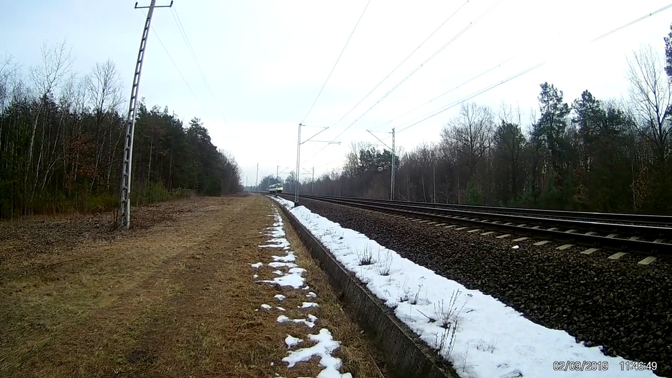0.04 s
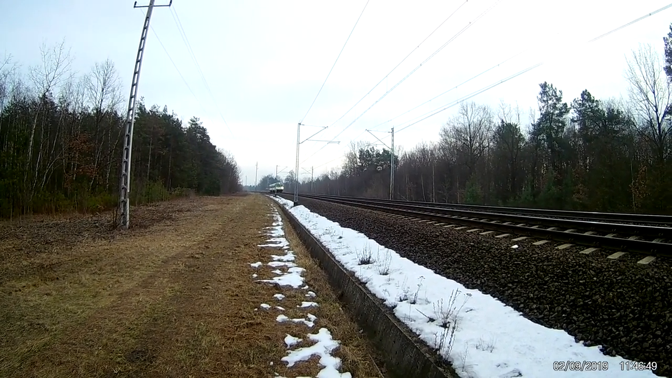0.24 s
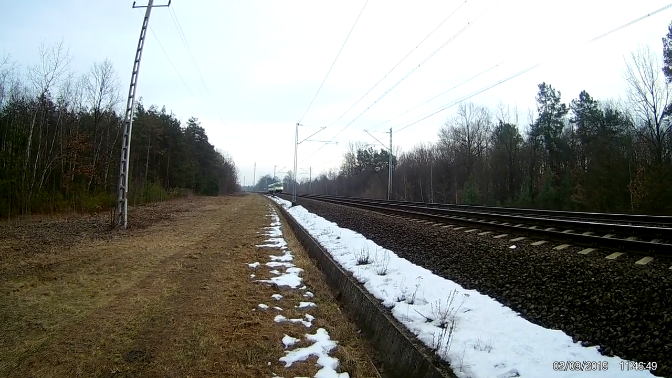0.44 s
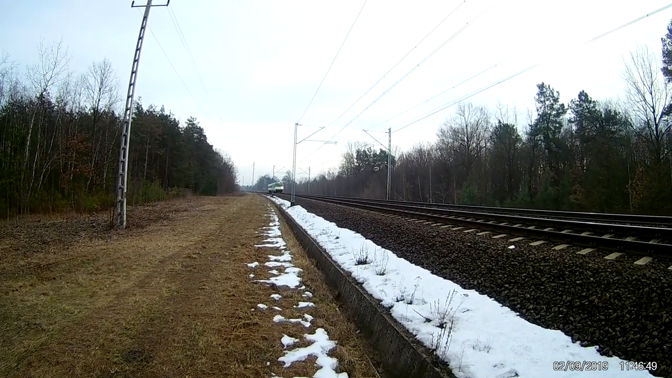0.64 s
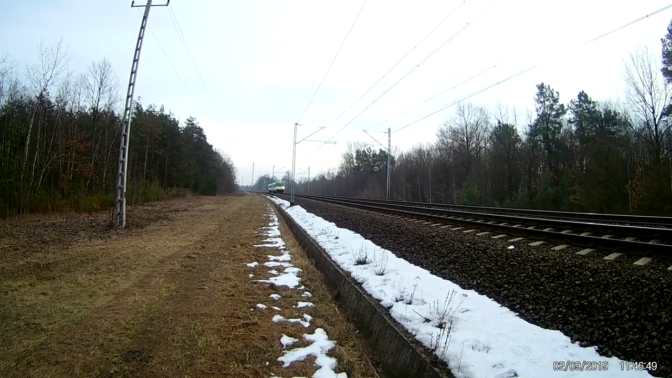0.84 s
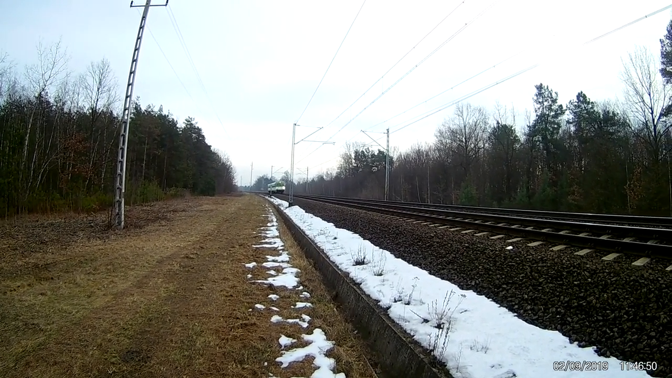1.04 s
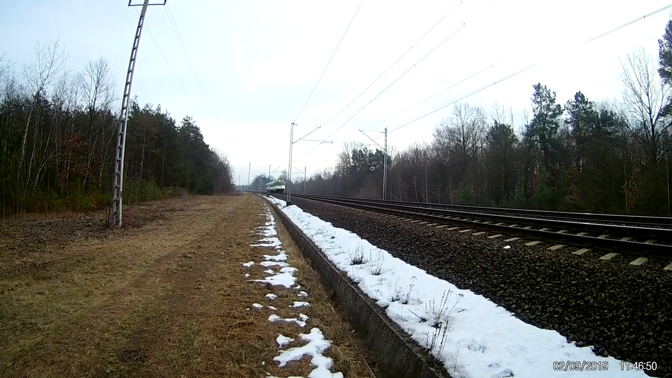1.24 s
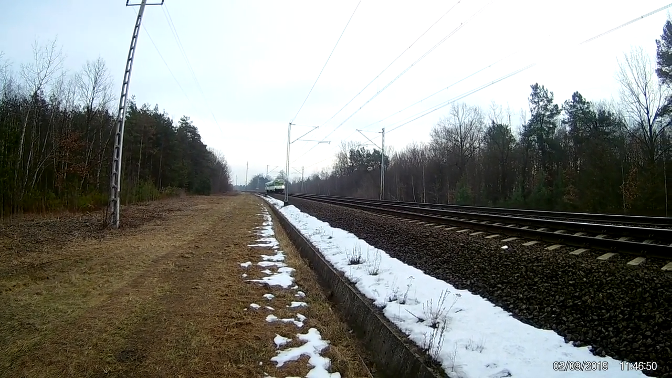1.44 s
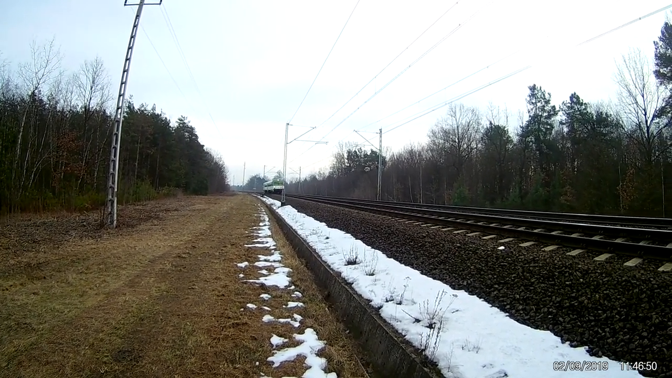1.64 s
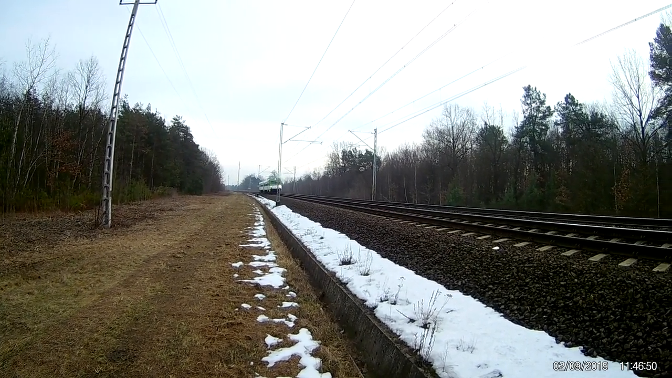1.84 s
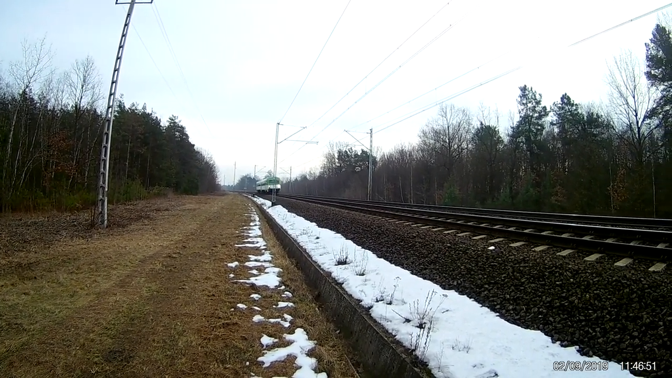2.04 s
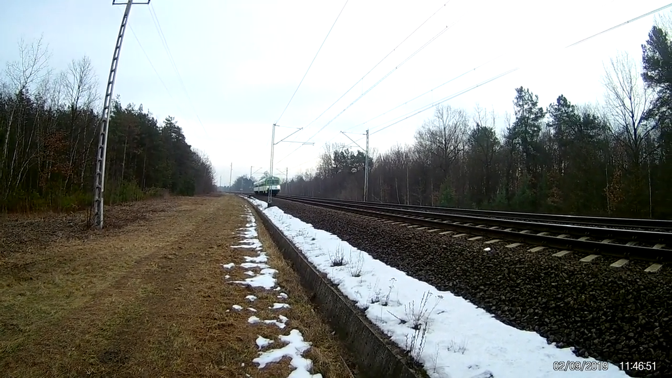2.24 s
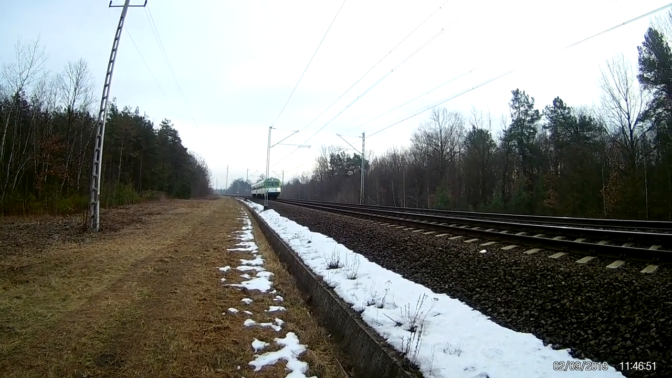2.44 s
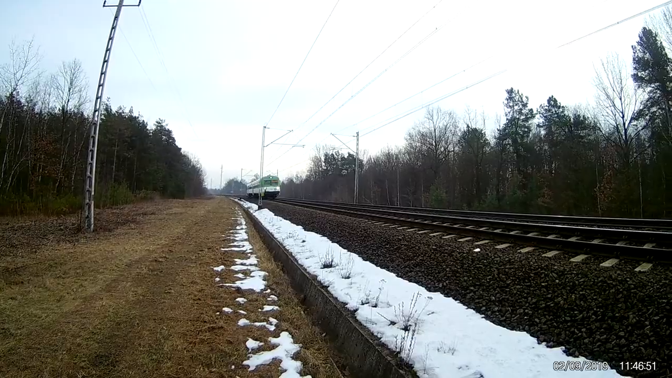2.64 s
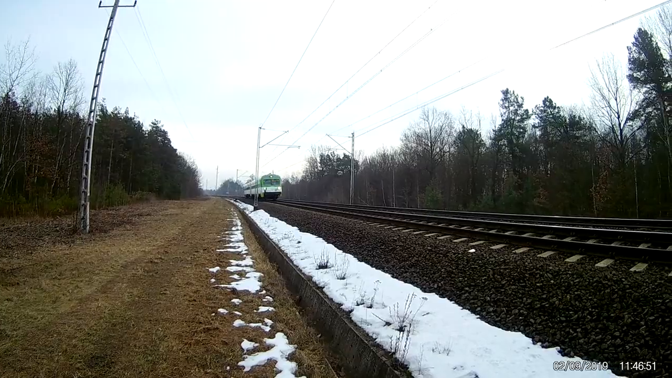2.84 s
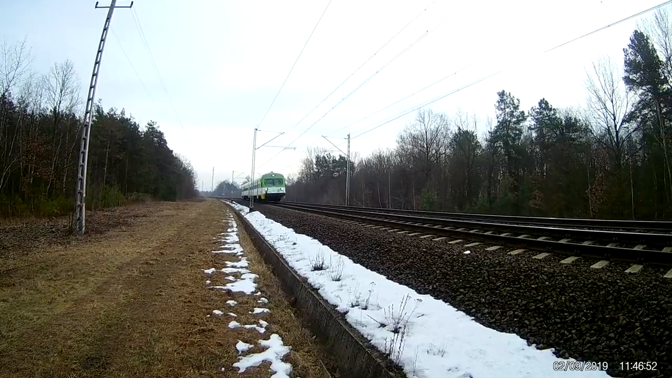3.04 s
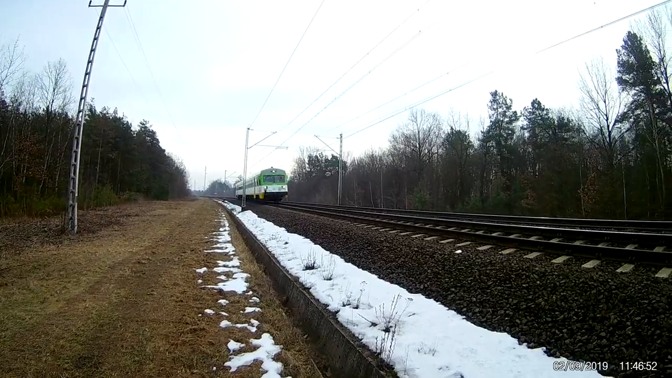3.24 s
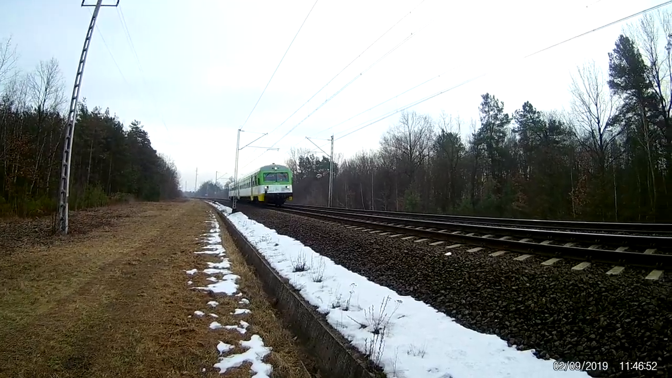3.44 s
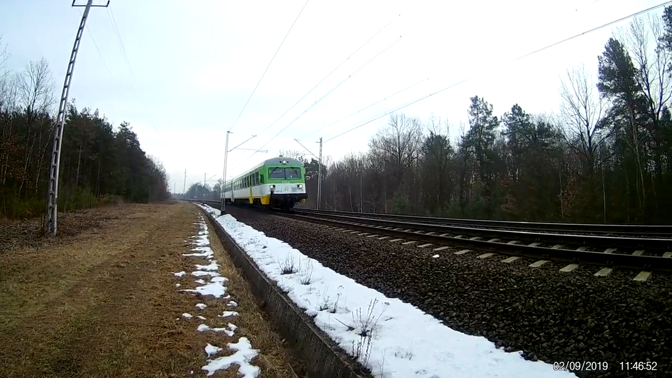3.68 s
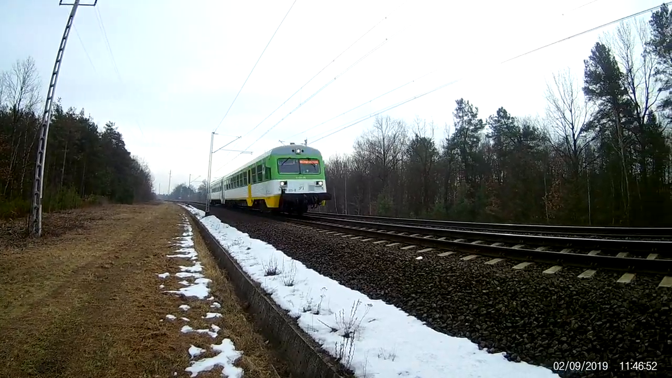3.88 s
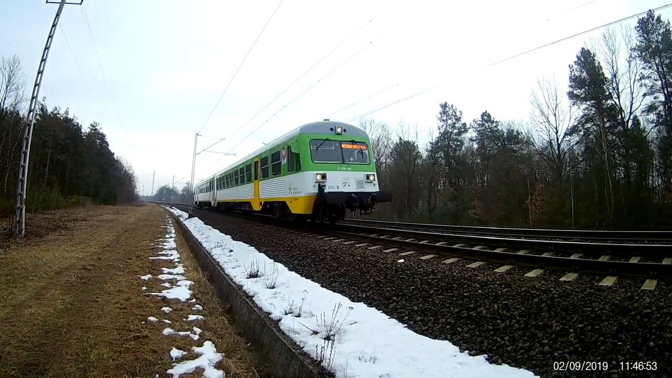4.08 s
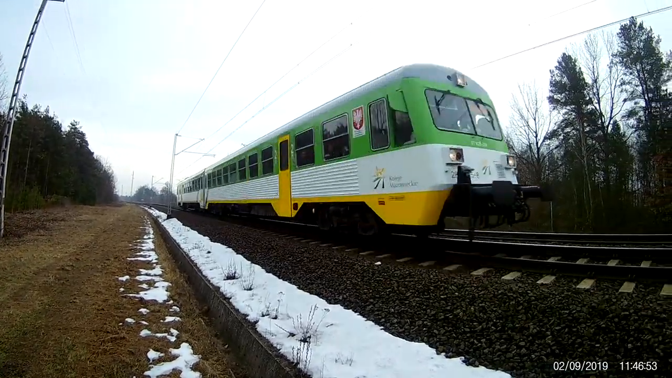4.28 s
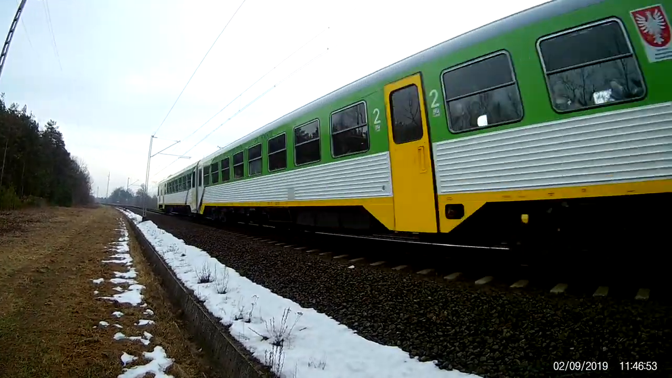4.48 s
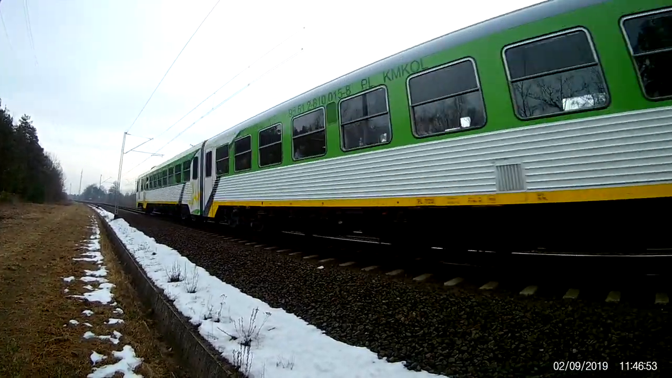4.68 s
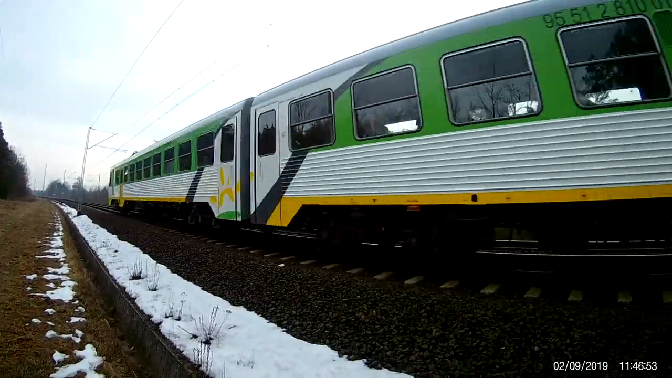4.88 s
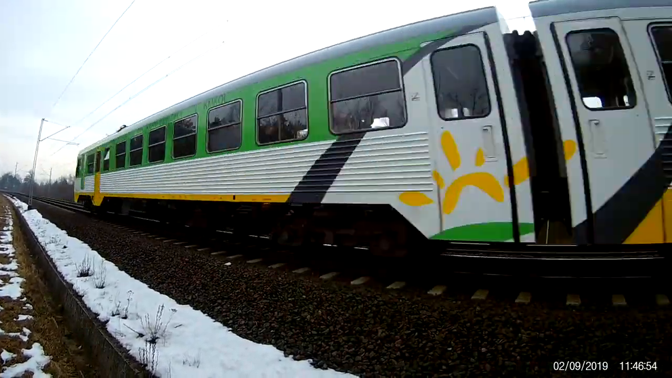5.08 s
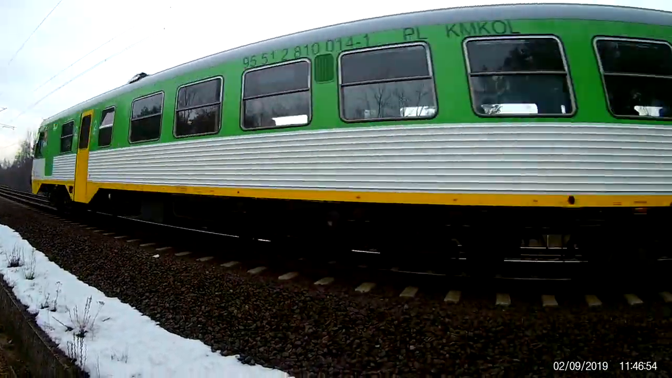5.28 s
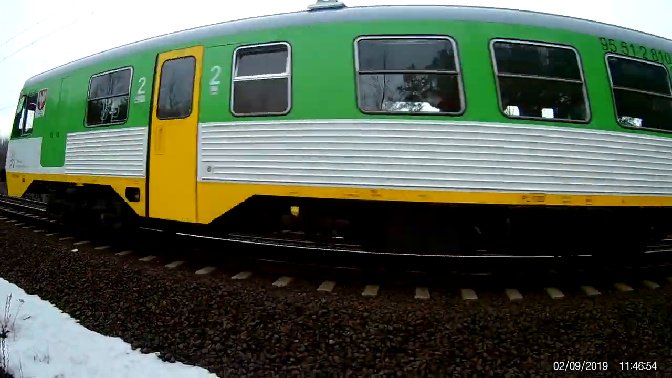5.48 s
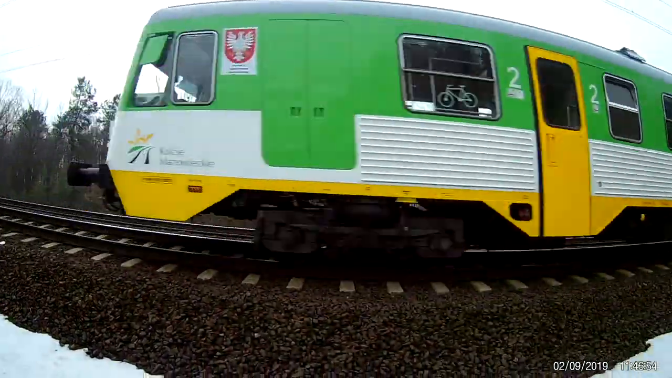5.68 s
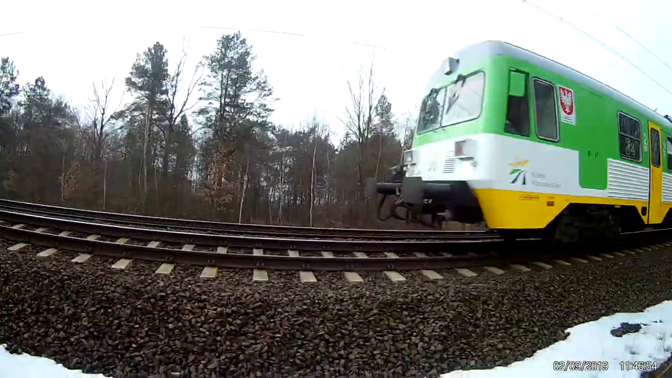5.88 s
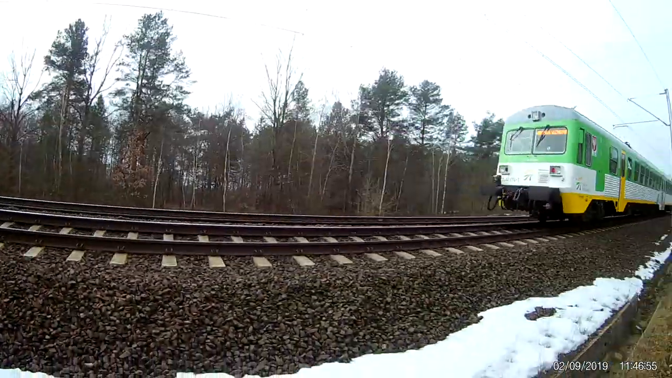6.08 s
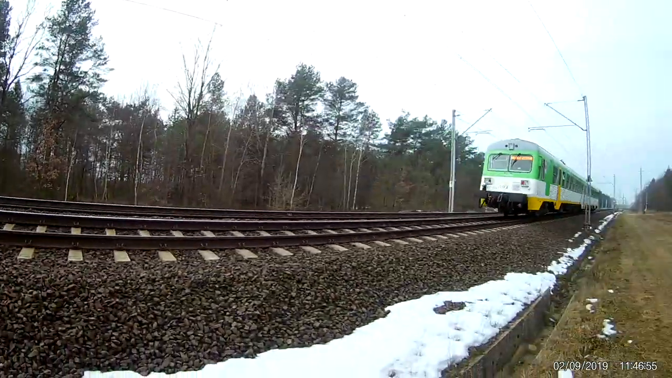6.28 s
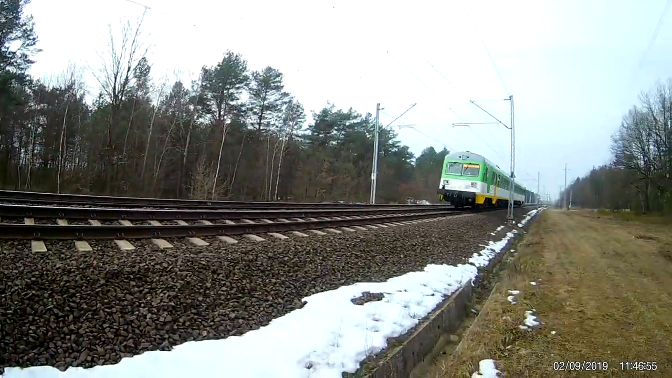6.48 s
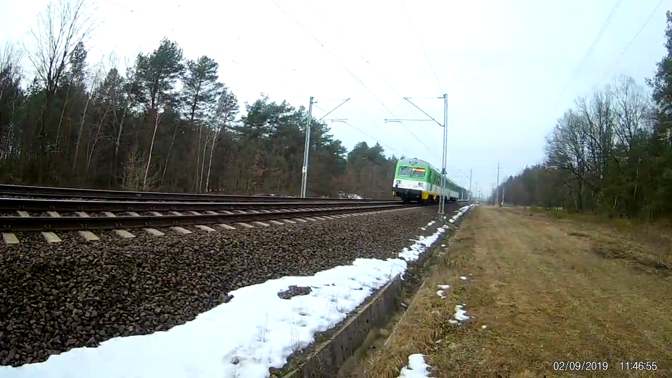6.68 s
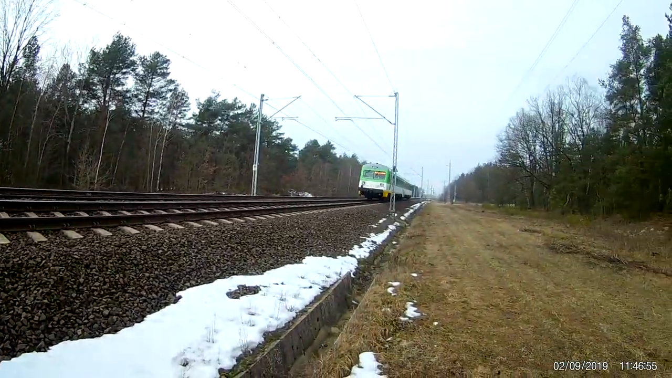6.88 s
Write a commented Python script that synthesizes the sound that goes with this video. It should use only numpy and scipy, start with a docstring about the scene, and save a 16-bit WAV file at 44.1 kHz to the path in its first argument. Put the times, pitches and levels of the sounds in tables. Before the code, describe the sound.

A single close trackside microphone hears a fast diesel railcar pair. First come soft low thumps from handling and a faint far-off rumble in the woods. The wheel roar swells steeply, pulsing quickly, with a thin high note in the rail. It peaks in about a second of loud rushing, ringing and droning, slides down in pitch, and recedes quickly with a lingering metallic singing.

```python
"""Soft bumps at the microphone come first, over the hush of a forest and the distant roar of a train.
A two-car diesel then runs past at 116 km/h, 7 m from the microphone: noise coloured by angle makes the roar
and hiss of its wheels, and a worn tread throbs. Randomly shaken modes make the ring of the wheels and sine
orders the drone of two engines, both dropping in pitch as they go by. Grit ticks under the cars, a thin note
runs in the rail, and the last wheels sing out behind the train."""
import sys
import numpy as np
from scipy import signal
from scipy.fft import rfft, irfft
from scipy.io import wavfile
from scipy.ndimage import uniform_filter1d, minimum_filter1d

SR = 44100
rng = np.random.default_rng(int(sys.argv[2]) if len(sys.argv) > 2 else 0)


def dump(signal):
    """Clip the signal to [-1, 1] and save it as 16-bit WAV at the path in sys.argv[1]."""
    limited = np.clip(np.atleast_2d(signal).T, -1, 1)
    pcm = np.round(limited * 32767).astype(np.int16)
    wavfile.write(sys.argv[1], SR, pcm)


N = 305543
FFT_SIZE, HOP = 1024, 256  # samples
TIME = np.arange(N) / SR
FRAME_S = np.arange(N // HOP + 5)[:, None] * HOP / SR
BIN_HZ = np.fft.rfftfreq(FFT_SIZE, 1 / SR)

TRAIN_SPEED, SOUND_SPEED = 32.2, 343  # m/s
TRACK_M = 7.0  # distance from the microphone to the rails


def gain_of(db):
    """Decibels to amplitude."""
    return 10 ** (np.asarray(db) / 20)


def evened(x):
    """Scales to rms 1."""
    return x / np.sqrt(np.mean(x ** 2) + 1e-20)


def colour(points):
    """A spectrum in dB on the bins, falling 60 dB per octave beyond its ends."""
    hz, db = np.transpose(points)
    octave, known = np.log2(BIN_HZ + 1), np.log2(hz + 1)
    beyond = abs(octave - np.clip(octave, known[0], known[-1]))
    return np.interp(octave, known, db) - 60 * beyond


def band_db(field_db, lo, hi):
    """Level of each frame of a time-frequency field between two frequencies."""
    band = field_db[..., (BIN_HZ >= lo) & (BIN_HZ < hi)]
    power = (gain_of(band) ** 2).sum(-1, keepdims=True)
    return 10 * np.log10(power + 1e-20)


def noise(field_db, patchy_db):
    """Noise shaped by the bin levels, with small random patches in time and frequency."""
    real, imag, patches = rng.standard_normal((3, len(FRAME_S), len(BIN_HZ)))
    patches = uniform_filter1d(patches, size=8, axis=0)
    patches = evened(uniform_filter1d(patches, size=7, axis=1))
    bins = (real + 1j * imag) * gain_of(field_db + patchy_db * patches)
    sound = signal.istft(bins.T, nperseg=FFT_SIZE, noverlap=FFT_SIZE - HOP)[1][:N]
    return sound * np.sqrt(3 / 2)  # makes up for the overlap of independent frames


def wander(rate_hz):
    """Slow random drift of rms 1: noise through a Gaussian low-pass."""
    step = 32  # samples between the points of the drift
    size = N // step + 2
    low_pass = np.exp(-(np.fft.rfftfreq(size, step / SR) / rate_hz) ** 2)
    slow = irfft(rfft(rng.standard_normal(size)) * low_pass, size)
    return np.interp(np.arange(N) / step, np.arange(size), evened(slow))


def shaken(turns, width_hz):
    """A lightly damped mode shaken at random: a fuzzy tone of rms 1."""
    in_phase = wander(width_hz) * np.cos(2 * np.pi * turns)
    return in_phase + wander(width_hz) * np.sin(2 * np.pi * turns)


def swell(middle_s, half_s, height):
    """A smooth rise and fall in time."""
    return height * np.exp(-((TIME - middle_s) / half_s) ** 2)


def add(mix, s, sound):
    """Mixes a sound in at the time s."""
    part = mix[round(s * SR):][:len(sound)]
    part += sound[:len(part)]


def knock(hz, width_hz, decay_s):
    """A short burst of noise in one broad, steep-sided resonance, with peak 1."""
    t = TIME[:SR // 4]
    burst = rng.standard_normal(len(t)) * np.exp(-t / decay_s)
    pole = np.exp((2j * hz - width_hz) * np.pi / SR)
    sound = signal.lfilter([1], np.poly([pole, pole, pole]), burst).real
    return sound / abs(sound).max()


def flyby(abreast_s, t):
    """Distance (m) and Doppler factor of a point on the train, as heard at the times t."""
    mach = TRAIN_SPEED / SOUND_SPEED
    late = t - abreast_s + TRACK_M / SOUND_SPEED
    along_m = TRAIN_SPEED * late
    slant_m = np.sqrt(along_m ** 2 + (1 - mach ** 2) * TRACK_M ** 2)
    far = (slant_m - mach * along_m) / (1 - mach ** 2)
    return far, 1 / (1 + mach * (along_m - mach * far) / far)


# the bounce off the ground acts most at one range: distance [m], half-width [doublings of distance]
DIP_M, DIP_WIDTH = 16, 0.81
SIDE_FOCUS = 5  # how narrowly sound is beamed to the side (power of the sine of the angle)


def passing(times, levels_db, carry, t):
    """Summed level (dB) of like sources that come abreast at the given times, by distance and angle."""
    doubling_db, side_db, past_db, dip_db = carry
    power = 0
    for s, db in zip(times, levels_db):
        far, doppler = flyby(s, t)
        near = TRACK_M / far  # also the sine of the angle to the track
        past = (1 / doppler - 1) * SOUND_SPEED / TRAIN_SPEED  # its cosine: -1 ahead, +1 behind
        ground_dip_db = dip_db * np.exp(-(np.log2(far / DIP_M) / DIP_WIDTH) ** 2)
        range_db = doubling_db * np.log2(near) - ground_dip_db
        angle_db = side_db * (near ** SIDE_FOCUS - 1) + past_db * past
        power += gain_of(db + range_db + angle_db) ** 2
    return 10 * np.log10(power)


# each bogie abreast of the microphone, levels before the ground dip: (time [s], roar [dB],
# harsh upper roar [dB], hiss [dB], rail sizzle [dB], track-bed rumble [dB])
BOGIES = [(4.455, -17.5, -20.8, -44, -38, -30), (4.86, -15.5, -17, -36.5, -39, -30),
          (5.3, -14.5, -18, -36, -46.5, -27), (5.69, -16, -20.5, -40.5, -53, -29.5)]
# how each sound carries to the microphone: (loss per doubling of distance [dB], rise side-on [dB],
# rise behind and equal fall ahead [dB], loss in the ground dip [dB])
ROAR_CARRY = (10, -5, -0.8, 4.5)
HARSH_CARRY = (8.5, -0.2, 0.9, 1.5)
HISS_CARRY = (10.5, -2.5, 0, 5)
SIZZLE_CARRY = (9.8, 6, 0.3, 2)
RUMBLE_CARRY = (10.5, -2.5, -0.6, 0.5)


def bogie_levels(t):
    """Levels (dB) of the five sounds of the bogies at the times t."""
    times, *columns = np.transpose(BOGIES)
    carries = dict(roar=ROAR_CARRY, harsh=HARSH_CARRY, hiss=HISS_CARRY, sizzle=SIZZLE_CARRY, rumble=RUMBLE_CARRY)
    return {name: passing(times, levels, carries[name], t) for name, levels in zip(carries, columns)}


def bogie_gain(name):
    """One sound of the bogies as a gain for every sample."""
    frame_s = FRAME_S.ravel()
    return gain_of(np.interp(TIME, frame_s, bogie_levels(frame_s)[name]))


# colour of the hush around the microphone: (frequency [Hz], relative level per Hz [dB])
FOREST = [(60, 0), (150, -3.5), (250, -22.5), (330, -3), (430, -1), (560, 1), (900, -8), (2000, -24),
          (5000, -43.5)]
FOREST_DB = -54  # level between 20 and 8000 Hz


def forest():
    """The low, steady hush of the woods, as coloured noise."""
    hush = colour(FOREST)
    return noise(hush - band_db(hush, 20, 8000) + FOREST_DB, patchy_db=1)


# soft bumps at the microphone: (time [s], peak [dB])
BUMPS = [(.1, -35.5), (.18, -35.5), (.265, -39), (0.368, -39), (.425, -36), (1.031, -36), (1.108, -42)]


def microphone_bumps():
    """Dull bumps nudge the microphone: short bursts in one broad low resonance."""
    out = np.zeros(N)
    for s, db in BUMPS:
        add(out, s, gain_of(db) * knock(hz=126, width_hz=340, decay_s=0.021))
    return out


# grit close by under the cars: (time [s], peak [dB], pitch of the ring [Hz], decay [s])
TICKS = [(4.699, -22, 4030, .011), (4.756, -21, 4200, 0.0094), (4.82, -33, 8600, .0005),
         (4.874, -24, 3960, 0.009), (4.934, -27, 4100, .009), (5.352, -24.5, 3940, 0.022)]


def grit_ticks():
    """Grit ticks against the running gear: each hit is a short, broadly resonant burst."""
    out = np.zeros(N)
    for s, db, hz, decay_s in TICKS:
        add(out, s, gain_of(db) * knock(hz, width_hz=0.6 * hz, decay_s=decay_s))
    return out


# colours of the air, grit and track bed below the cars: (frequency [Hz], relative level per Hz [dB])
RUMBLE = [(32, -22.5), (55, -6), (75, 2.5), (110, 0), (160, 2.5), (205, 4.5), (260, -1.5), (310, -0.5),
          (380, -1), (500, -17)]
BUFFET = [(12, -25), (24, -11), (35, -1), (48, -4), (62, -3), (90, -25.5), (160, -54)]
SPRAY = [(7000, -31.5), (8000, -8), (8500, 5.5), (9300, -1), (10300, 3), (11500, -5.5), (13000, -18.5),
         (14600, -20), (16000, -17)]
# underbody of each car abreast, before the ground dip:
# (time [s], spray of air and grit [dB], deep buffeting [dB])
CARS = [(4.77, -58.5, -44), (5.33, -55, -48.5)]
# how they carry, same columns as the bogies' (a negative last column is a gain)
BUFFET_CARRY = (2.5, 0.8, -0.7, -2.5)
SPRAY_CARRY = (7.5, 5.7, 0.5, 0.2)


def underside():
    """Rumble of the track bed under the bogies; buffeting air and a fine spray under each car."""
    times, spray_db, buffet_db = np.transpose(CARS)
    rumble, buffet, spray = colour(RUMBLE), colour(BUFFET), colour(SPRAY)
    rumble = rumble - band_db(rumble, 130, 330) + bogie_levels(FRAME_S)["rumble"]
    buffet = buffet - band_db(buffet, 20, 48) + passing(times, buffet_db, BUFFET_CARRY, FRAME_S)
    spray = spray - band_db(spray, 8300, 15000) + passing(times, spray_db, SPRAY_CARRY, FRAME_S)
    return noise(rumble, patchy_db=1.05) + noise(buffet, patchy_db=3.5) + noise(spray, patchy_db=0.0)


# front and rear engine: (time the block is abreast [s], cycle rate [Hz], lift of its orders when close [dB])
ENGINES = [(4.72, 16.98, 3), (5.36, 15.5, 9)]
# their exhausts abreast, before the ground dip: (time [s], drone [dB])
EXHAUSTS = [(4.63, -21), (5.53, -27.5)]
# six cylinders fire in a cycle: (multiple of the cycle rate, level relative to the drone [dB])
ENGINE_ORDERS = [(2, -27), (3, -10), (4, -22.5), (6, 0), (8, -21), (9, -15.5), (12, -17.5), (15, -23),
                 (18, -26.5), (22, -22.5)]
# how the drone carries, same columns as the bogies'
DRONE_CARRY = (7.5, -5, -1, 7)


def engines():
    """A diesel under each car drones at the firing rate; close up, its block lifts the other orders."""
    out = np.zeros(N)
    for (abreast_s, cycle_hz, block_db), (exhaust_s, drone_db) in zip(ENGINES, EXHAUSTS):
        far, doppler = flyby(abreast_s, TIME)
        level_db = passing([exhaust_s], [drone_db], DRONE_CARRY, TIME)
        unsteady = 1 + 0.0022 * wander(rate_hz=5.2)
        turns = np.cumsum(cycle_hz * doppler * unsteady) / SR
        for multiple, db in ENGINE_ORDERS:
            order = round(multiple)
            lift_db = block_db * (TRACK_M / far) ** 2 * (order != 6)  # order 6 is the firing rate
            drift_db = 2.0 * wander(rate_hz=8.6)
            tone = np.sin(2 * np.pi * (order * turns + rng.random()))
            out += np.sqrt(2) * gain_of(level_db + db + lift_db + drift_db) * tone
    return out


SIZZLE_HZ = 4055  # pitch of the rail's note and sizzle
NOTE_DB, NOTE_LOSS_DB_PER_M = -57.5, 0.3  # note at the bogie, and its loss along the rail


def singing_rail():
    """A thin high note runs along the rail from the nearest bogie and spreads into a sizzle under the wheels."""
    nearest_m = np.min([flyby(s, TIME)[0] for s, *_ in BOGIES], axis=0)
    flare_db = swell(middle_s=3.56, half_s=0.12, height=8.9)  # once, ahead of the train
    note_gain = gain_of(NOTE_DB - NOTE_LOSS_DB_PER_M * nearest_m + flare_db)
    note = note_gain * shaken(SIZZLE_HZ * TIME, width_hz=65)
    return note + bogie_gain("sizzle") * shaken(SIZZLE_HZ * TIME, width_hz=760)


# modes of the last wheels before Doppler: (frequency [Hz], width [Hz], level relative to SINGING_DB [dB])
SINGING_MODES = [(868, 12, -4), (2024, 9, -3.5), (2025, 67, -5.5), (2690, 12, -22.5)]
SINGING_S, SINGING_RISE_S, SINGING_DB = 5.6, 0.3, -38  # time of full level, rise before it, level


def singing_wheel():
    """A few modes of the last wheels sing out behind the train and hold."""
    last_s, *_ = BOGIES[-1]
    clock = np.cumsum(flyby(last_s, TIME)[1]) / SR
    rise = np.clip(1 + (TIME - SINGING_S) / SINGING_RISE_S, 0, 1)
    modes = sum(gain_of(db) * shaken(hz * clock, width) for hz, width, db in SINGING_MODES)
    return gain_of(SINGING_DB) * rise * modes


# wheel resonances before Doppler, gliding with their bogie:
# (frequency [Hz], width [Hz], level relative to the roar [dB], lift when abreast [dB])
WHEEL_MODES = [(715.4, 5.3, -23, 13.5), (863, 12, -12.5, 3), (929, 7.7, -12.5, 4.5), (1060, 6, -26.5, 0),
               (1145, 24, -26.5, 1.5), (1973, 8.7, -26, 10.5), (2170, 12, -35.5, 13.5),
               (2640, 8.1, -39, 7.5), (2765, 15, -34, 4), (4710, 45, -42, 8.5), (5100, 45, -53.5, 5)]
# resonances of the track, steady in pitch: (frequency [Hz], width [Hz], level relative to the roar [dB])
RAIL_MODES = [(630, 12, -17), (695, 10, -15), (985, 12, -17), (1510, 9, -14)]


def ringing():
    """Wheel modes glide with their bogie and radiate most to the side; the rail rings mainly beside the train."""
    fars, dopplers = np.transpose([flyby(s, TIME) for s, *_ in BOGIES], (1, 0, 2))
    nears = TRACK_M / fars
    nearness = np.sqrt((nears ** 2).sum(0))
    out = np.zeros(N)
    for near, doppler in zip(nears, dopplers):
        clock = np.cumsum(doppler) / SR
        for hz, width, db, side_db in WHEEL_MODES:
            side_lift = 1 + (gain_of(side_db) - 1) * near ** 2
            out += near / nearness * gain_of(db) * side_lift * shaken(hz * clock, width)
    rail = sum(gain_of(db) * shaken(hz * TIME, width) for hz, width, db in RAIL_MODES)
    return bogie_gain("roar") * (out + np.minimum(nearness, 1) * rail)


# unevenness of the worn tread: (multiple of the turning rate, swing at depth 1 [dB])
TREAD = [(1, 1.2), (2, .55), (3, .8), (4, .55), (6, .35), (9, .3)]
WHEEL_TURNS_PER_S = 13.06  # before Doppler
THROB_PEAK_S = 3.17  # a moment when all the swings peak together


def worn_tread():
    """Gain that throbs with each turn of a worn wheel on the leading bogie."""
    lead_s, *_ = BOGIES[0]
    turns = np.cumsum(WHEEL_TURNS_PER_S * flyby(lead_s, TIME)[1]) / SR
    turns = turns - np.interp(THROB_PEAK_S, TIME, turns)
    depth = 0.26 + swell(middle_s=2.85, half_s=0.83, height=0.44)  # deepens on the approach
    return gain_of(depth * sum(db * np.cos(2 * np.pi * round(k) * turns) for k, db in TREAD))


def ground_echo(detour_m=0.49, depth_db=3.0, fade_hz=1100):
    """Ripple in dB from the bounce off the ground; its peaks dip in pitch as each bogie goes by."""
    fars = np.array([flyby(s, FRAME_S)[0] for s, *_ in BOGIES])
    shares = fars ** -4. / (fars ** -4.).sum(0)
    near = TRACK_M / fars
    comb = np.cos(2 * np.pi * BIN_HZ * detour_m * near / SOUND_SPEED)
    return depth_db * (shares * near * comb).sum(0) * np.exp(-(BIN_HZ / fade_hz) ** 2)


# colour of the roar from each place: (frequency [Hz], relative level per Hz [dB])
ROAR_FAR = [(160, -42), (280, -40), (306, -11.5), (329, -18), (397, -33), (466, -5), (495, -17.5),
            (587, -7), (910, 0), (1100, -4), (1300, -1), (1710, -13.5), (2130, -12.5), (2550, -24),
            (3050, -22.5), (3960, -64), (6710, -120)]
ROAR_NEAR = [(160, -51), (280, -9.5), (352, -7), (385, -10.5), (422, -0.5), (515, -7.5), (587, 2),
             (792, -2), (920, 3.5), (1270, -6), (1490, -8.5), (1760, -13.5), (2260, -17.5), (2570, -28),
             (3050, -23), (3960, -70), (6710, -120)]
ROAR_ABREAST = [(160, -47), (280, -16.5), (306, -20.5), (365, -7.5), (471, -2), (610, 2), (840, -6),
                (1010, -1.5), (1160, -0.5), (1240, -7.5), (1490, -1.5), (1670, -9), (2150, -10.5),
                (2450, -22), (2870, -19.5), (3050, -24), (3960, -58), (6710, -120)]
ROAR_LEAVING = [(160, -50), (280, -28), (319, -22), (370, -24.5), (485, 3.5), (675, -2.5), (784, 5.5),
                (824, -15), (883, 6), (1270, -7), (1370, -1.5), (1660, -14.5), (1910, -5), (2090, -17),
                (3050, -28.5), (3960, -59), (6710, -120)]
# when the train is far, near, abreast from, abreast to, leaving: (time [s])
STAGES = [2.3, 3.9, 4.7, 5.6, 6.3]
# colour of the hiss far off and abreast: (frequency [Hz], relative level per Hz [dB])
HISS_FAR = [(2600, -30.5), (3150, 1.5), (3600, 0), (4100, -2.5), (4550, -3.5), (5200, -5), (5700, 0.5),
            (6050, -8), (6900, 3), (7300, -3), (7600, -16), (8500, -55.5)]
HISS_ABREAST = [(2600, -29), (3200, -1), (3900, 1.5), (4600, -3.5), (5700, -5), (6500, -12), (7200, -17),
                (7700, -26), (8500, -56)]


def rolling():
    """Rough steel rolling on steel: a roar and a hiss that change colour with the angle to the train."""
    shares = [np.interp(FRAME_S, STAGES, row) for row in np.eye(len(STAGES))]
    views = (ROAR_FAR, ROAR_NEAR, ROAR_ABREAST, ROAR_ABREAST, ROAR_LEAVING)
    roar = sum(share * colour(view) for share, view in zip(shares, views)) + ground_echo()
    roar = roar + np.interp(BIN_HZ, [3070, 3160], [0, -9])  # the roar ends in a sharp step
    level = bogie_levels(FRAME_S)
    upper = 1 / (1 + (1250 / (BIN_HZ + 1)) ** 6)  # crossover from roar to harsh roar
    roar_lift_db = level["roar"] - band_db(roar, 350, 1250)
    harsh_lift_db = level["harsh"] - band_db(roar, 1250, 3200)
    roar = roar + (1 - upper) * roar_lift_db + upper * harsh_lift_db
    distant = shares[0] + 0.5 * shares[1] + 0.39 * shares[-1]
    hiss = distant * colour(HISS_FAR) + (1 - distant) * colour(HISS_ABREAST)
    hiss = hiss + level["hiss"] - band_db(hiss, 3300, 7500)
    return noise(roar, patchy_db=1.25) + noise(hiss, patchy_db=1.0)


def scene():
    """The woods and the whole train, heard by one microphone."""
    uneven_rail = gain_of(0.55 * wander(rate_hz=22))
    wheels = (rolling() + ringing()) * worn_tread() * uneven_rail
    singing = singing_rail() + singing_wheel()
    background = forest() + microphone_bumps()
    return (background + grit_ticks() + underside() + engines() + singing + wheels)[None]


def record(dry):
    """Faint electronic hiss, a narrow dead spot in the treble, a smooth peak limiter, band limit."""
    notch = signal.iirnotch(7930, 9, fs=SR)
    sound = signal.lfilter(*notch, dry) + gain_of(-78.5) * rng.standard_normal(dry.shape)
    allowed = minimum_filter1d(1 / np.maximum(abs(sound), 1), size=129)
    sound = sound * uniform_filter1d(uniform_filter1d(allowed, size=63), size=63)
    low_pass = signal.firwin(511, 15750, window=("kaiser", 9), fs=SR)  # upper edge in Hz
    return signal.oaconvolve(sound, low_pass[None], "same")


dry = scene()
out = record(dry)
dump(out)
```